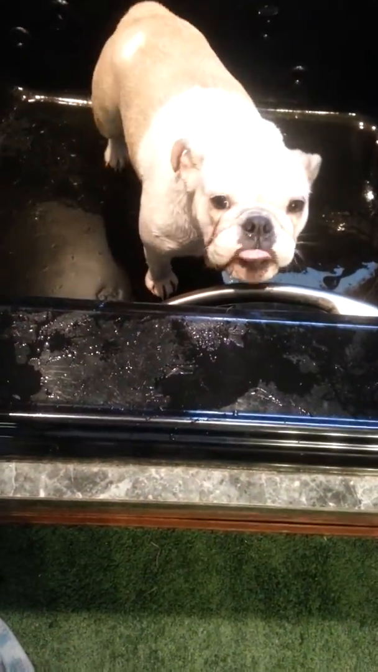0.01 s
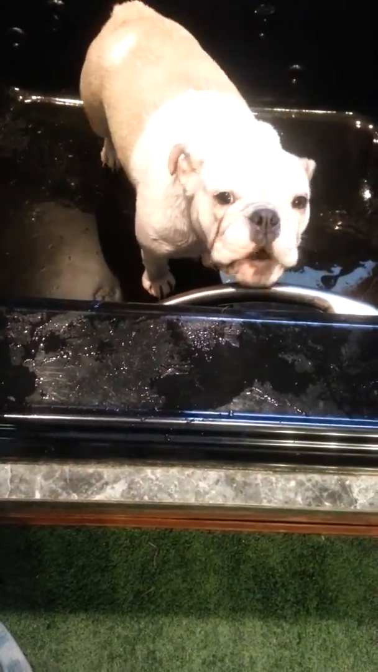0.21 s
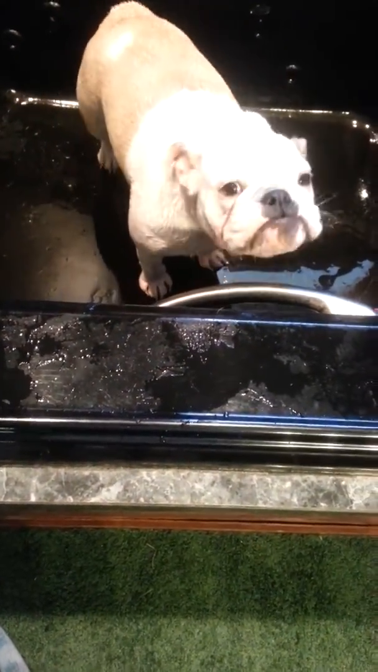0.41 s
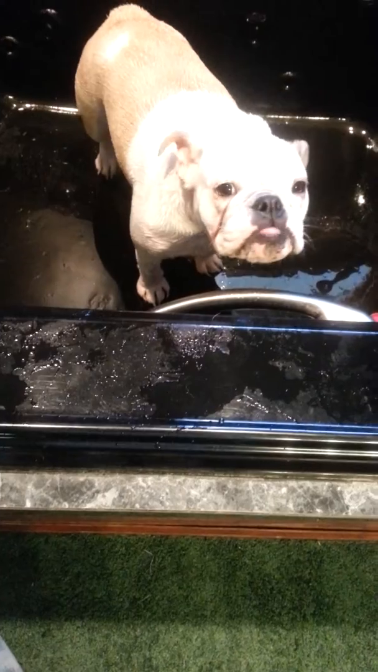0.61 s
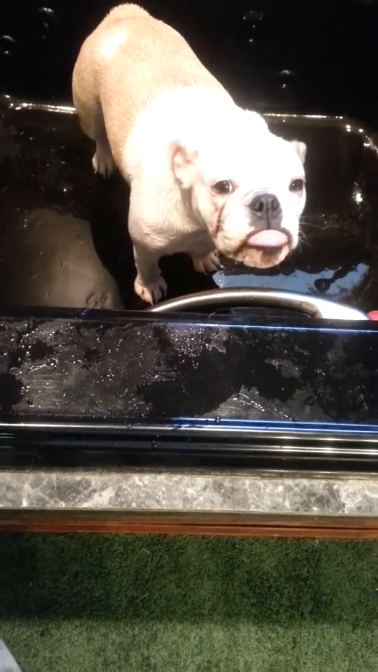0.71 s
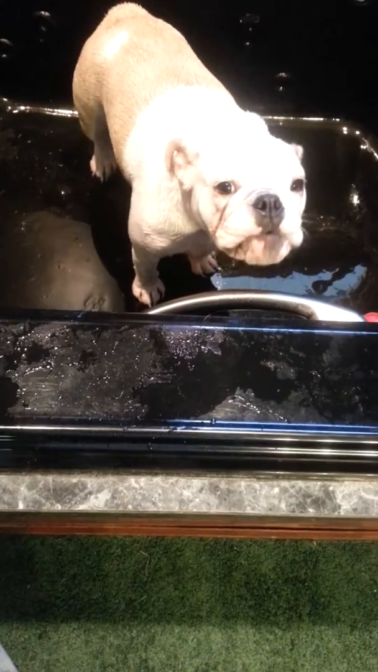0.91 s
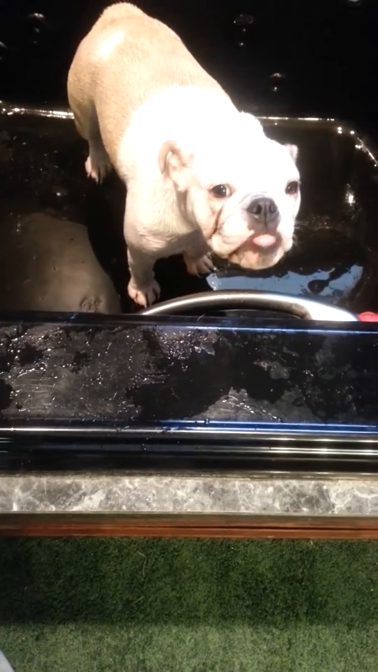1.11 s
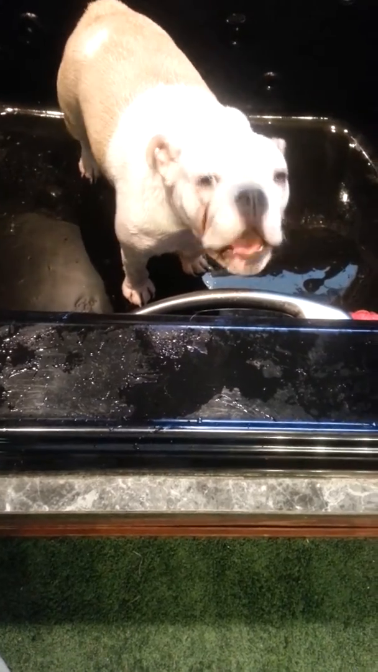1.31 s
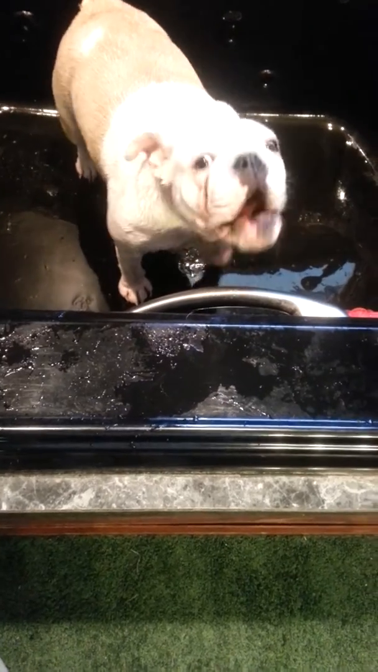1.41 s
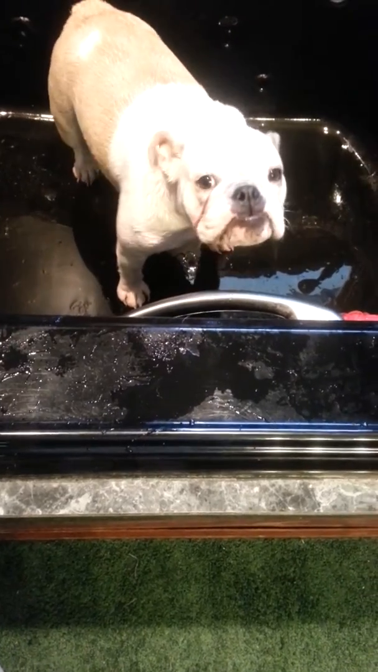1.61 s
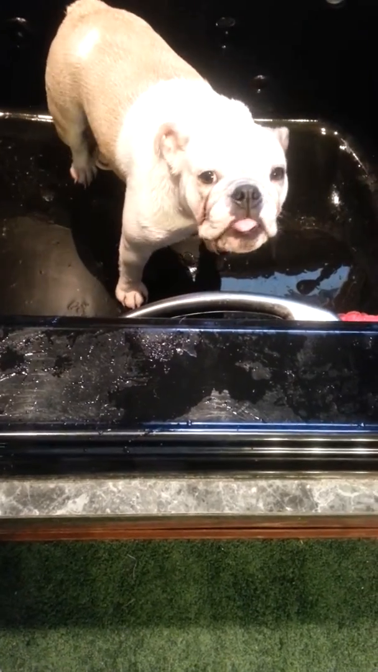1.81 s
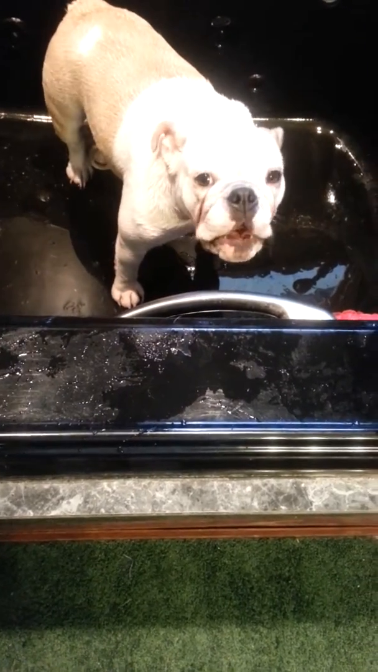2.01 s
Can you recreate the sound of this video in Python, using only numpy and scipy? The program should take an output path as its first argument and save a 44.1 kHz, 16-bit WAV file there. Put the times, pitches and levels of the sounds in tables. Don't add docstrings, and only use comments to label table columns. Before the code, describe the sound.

Two sharp, high-pitched puppy barks overload the microphone in a ringing tiled bathroom, between nasal huffs

```python
import sys
import numpy as np
from scipy import signal
from scipy.fft import rfft, irfft, next_fast_len
from scipy.io import wavfile
from scipy.ndimage import uniform_filter1d, minimum_filter1d

SR = 44100
rng = np.random.default_rng(int(sys.argv[2]) if len(sys.argv) > 2 else 0)


def generate_wav(sig):
    pcm = np.round(np.clip(np.atleast_2d(sig).T, -1, 1) * 32767).astype(np.int16)
    wavfile.write(sys.argv[1], SR, pcm)


def invert_db(level):
    return 10 ** (np.asarray(level, dtype=float) / 20)


N = 92610


def shape(x, gain):
    n = next_fast_len(x.shape[-1] + 4096)
    f = np.arange(n // 2 + 1) * SR / n + 1e-3
    return irfft(rfft(x, n) * gain(f), n)[..., :x.shape[-1]]


def unit(x):
    return x / np.sqrt(np.mean(x ** 2))


def peak(f, hz, width):
    return 1 / (1 + 1j * (f / hz - hz / f) * hz / width)


def points(f, table):
    table = np.array(table, float)
    return np.interp(np.log(f), np.log(table[:, 0]), table[:, 1])


def walk(rate_hz, size=N):
    k = max(int(SR / rate_hz), 1)
    noise = rng.standard_normal(size)
    return unit(uniform_filter1d(uniform_filter1d(noise, k), k))


def hum(hz, width):
    return unit(shape(rng.standard_normal(N), lambda f: peak(f, hz, width) ** 2))


def ring_down(age, t60):
    return np.exp(-np.log(1000) * age / t60)


def bark(rows, throat, second, jitter):
    jitter_hz, shimmer_db, low_rasp_db = 150, 2.5, -12
    rows = np.array(rows, float)
    start = int(rows[0, 0] * SR)
    t = np.arange(start, int(rows[-1, 0] * SR)) / SR
    hz, db, open_db, rasp_db = (np.interp(t, rows[:, 0], rows[:, k]) for k in range(1, 5))

    def tract(f):
        total = 0
        for k, (centre, width, gain_db) in enumerate(throat):
            total = total + (invert_db(gain_db + (k > 0) * open_db) * abs(peak(f, centre, width)) ** 2) ** 2
        return np.sqrt(total)

    voice = 0
    for ratio, gain_db in [(0.98, 0.0051)] + list(second):
        f = hz * ratio * (1 + jitter * walk(jitter_hz)[:len(t)])
        phase = 2 * np.pi * np.cumsum(f) / SR
        harmonics = range(1, int(12 / min(ratio, 1)))
        tone = sum(tract(k * f) * np.sin(k * phase + k * k) for k in harmonics)
        voice = voice + invert_db(gain_db + shimmer_db * walk(jitter_hz)[:len(t)]) * tone

    gate = .5 + .5 * np.cos(2 * np.pi * np.cumsum(hz) / SR)
    breath = rng.standard_normal(N)[:len(t)] * gate
    for k, (centre, width, gain_db) in enumerate(throat):
        rasp = unit(shape(breath, lambda f: peak(f, centre, width) ** 2))
        voice = voice + invert_db(rasp_db + gain_db + (open_db if k else low_rasp_db)) * rasp
    out = np.zeros(N)
    out[start:][:len(t)] = voice * invert_db(db)
    return out


def first_bark():
    # (time [s], pitch [Hz], level [dB], mouth opening [dB], rasp [dB])
    folds = [
        (.2385, 681.4, -39.5, -19, -27),
        (.2412, 652.6, 5, -21, -24.5),
        (.251, 648, 4, -9.5, -21),
        (.256, 630.7, -6, 10.5, 3),
        (.27, 600, -3.5, 6.5, -3.5),
        (.285, 575, 0, 6.5, -15.5),
        (.315, 557.6, -11.5, 13.5, -12),
        (.34, 530, -37.5, 31, -11),
    ]
    # (time [s], pitch [Hz], level [dB], mouth opening [dB], rasp [dB])
    broken = [
        (.282, 800, -24, 2.5, -5),
        (.293, 789.2, 5.5, -15, -15.5),
        (.315, 764.8, 5, -14.5, 0.5),
        (.34, 698, 0.5, -15, -11),
        (.37, 700.7, 2, -16.5, -10.5),
        (.40, 690, -27, -13.5, -19),
    ]
    # (centre [Hz], width [Hz], level [dB])
    throat = [(716, 332, 0.5), (1279, 140, -15), (1680, 290, -3.5), (2070, 210, -10.5), (2889, 150, -9),
              (3128, 460, -6), (4570, 3200, -16.5), (8000, 2300, -15.5)]
    # (pitch ratio to the folds, level [dB])
    second = [(0.5, -3)]
    return bark(folds, throat, second, 0.016) + bark(broken, throat, [(.91, -5)], 0.03)


def second_bark():
    # (time [s], pitch [Hz], level [dB], mouth opening [dB], rasp [dB])
    folds = [
        (1.297, 850, -50, -3.5, 2),
        (1.2995, 819, -31, -10, -6),
        (1.322, 666.5, -19.5, -28, 18.5),
        (1.333, 637.4, 4.5, -9.5, -5),
        (1.339, 892.8, 10, -4, 3.5),
        (1.365, 875.9, 3, 1.5, 0.5),
        (1.40, 850, 1.5, -3.5, 2.5),
        (1.424, 835.8, 6.5, -8, 0),
        (1.44, 830, -33.5, -19.5, 12),
    ]
    # (time [s], pitch [Hz], level [dB], mouth opening [dB], rasp [dB])
    dropped = [
        (1.418, 770, -23, -4, 4.5),
        (1.43, 755.8, 0.5, -16.5, 1.5),
        (1.455, 731.2, -6.5, -5.5, 3),
        (1.5, 714, -29.5, 2.5, 4.5),
    ]
    # (centre [Hz], width [Hz], level [dB])
    throat = [(830, 487, -0.5), (1340, 580, -11.5), (2200, 700, -2.5), (2963, 890, -3), (5150, 1600, -12.5),
              (7800, 330, -20)]
    # (pitch ratio to the folds, level [dB])
    second = [(1.25, -9), (0.2, -10)]
    return bark(folds, throat, second, 0.012) + bark(dropped, throat, [(.93, -7.5)], 0.03)


def snuffles():
    # (start [s], rise [s], hold [s], level [dB], brightness
    # [dB per octave])
    breaths = [(.0, 0.0063, 0.014, -56, 2.5), (0.027, 0.001, 0.02, -46.5, -1.5),
               (0.095, 0.043, 0.046, -52.5, -0.5), (0.185, 0.0022, 0.046, -45, -2.5),
               (0.385, 0.046, 0.086, -26.5, 2.5), (0.7729, 0.00092, 0.026, -39, 5.5),
               (0.796, 0.023, 0.043, -40, 1), (0.852, 0.019, 0.11, -47, -1),
               (0.873, .001, 0.0055, -43.5, 3), (0.953, 0.0009, 0.0043, -42, 1.5),
               (1.013, 0.064, .12, -63, 4), (1.2975, 0.00089, 0.031, -33, -0.5),
               (1.457, 0.079, 0.063, -25, 2), (1.66, 0.016, 0.066, -47, 9),
               (1.692, 0.014, 0.034, -44.5, -6.5), (1.962, 0.019, 0.074, -61.5, -5)]
    # (centre [Hz], width [Hz], level [dB])
    nostrils = [(500, 280, -2.5), (850, 140, -2), (1210, 450, -2.5), (1700, 590, -14), (2160, 1100, -3.5),
                (2760, 1200, -7), (3780, 1300, -0.5), (4820, 1100, -1), (7200, 1800, -8.5),
                (11400, 1500, -19.5)]
    fall_ratio, flutter_hz, flutter_db = 0.26, 60, 1.5
    t = np.arange(N) / SR
    s, rise, hold, db, tilt_db = np.array(breaths, float).T[:, :, None]
    attack = np.clip((t - s) / rise, 0, 1)
    fall = np.exp(-np.clip(t - s - rise - hold, 0, None) / (fall_ratio * hold))
    puffs = invert_db(db) * attack * fall
    bands = [invert_db(gain_db + walk(30)) * hum(hz, width) for hz, width, gain_db in nostrils]
    octaves = np.log2(np.array(nostrils)[:, :1] / 2000)
    weights = invert_db(octaves * tilt_db.T) @ puffs
    return (weights * bands).sum(axis=0) / 2 * invert_db(flutter_db * walk(flutter_hz))


def whistles():
    # (start [s], length [s], pitch [Hz], width [Hz], level [dB])
    squeaks = [
        (.79, .06, 1680, 70, -45),
        (.87, 0.068, 2560, 90, -42.5),
        (1.031, 0.22, 2517, 120, -61),
        (1.782, 0.18, 2650, 80, -63.5),
    ]
    t = np.arange(N) / SR
    out = np.zeros(N)
    for s, length, hz, width, db in squeaks:
        swell = np.sin(np.pi * np.clip((t - s) / length, 0, 1))
        out += invert_db(db) * swell * hum(hz, width)
    return out


def paws():
    # (time [s], peak [dB], hardness [dB per octave], mode favoured by the spot [Hz])
    steps = [(0.027, -34.5, -3.5, 840), (0.086, -46, 1, 760), (0.145, -41.5, 6.5, 500),
             (0.196, -26, 6, 500), (0.795, -34.5, 8.5, 800), (0.817, -26, 5.5, 790), (0.874, -21.5, 3, 600),
             (0.883, -30.5, -2, 600), (0.9, -25.5, -4.5, 500), (0.956, -24.5, -7, 400),
             (0.979, -24.5, -11, 400), (1.029, -37.5, -12, 300), (1.049, -38.5, -9.5, 280),
             (.41, -19.5, -2.5, 300), (1.439, -26, -5, 290), (1.472, -22.5, -18, 290),
             (1.499, -16.5, -12, 296), (1.536, -25, -12, 291), (1.571, -29.5, -12.5, 290),
             (1.639, -27.5, 3.5, 500)]
    # (pitch [Hz], level [dB], t60 [s])
    modes = [(215, -26, 0.044), (275, 8.5, 0.051), (294, -10.5, 0.12), (410.4, -5, 0.082),
             (535.5, -5, 0.02), (600, -4.5, 0.06), (690, -15.5, 0.04), (770, -11, 0.031),
             (850, -12.5, 0.04), (1640, -22, 0.08), (2786, -20.5, 0.045)]
    paws_db, knock_db, pad_s, low_hz = 1, -26.5, 0.0016, 230
    spot_db, spot_octaves, detune_ratio = 7, .2, 0.0091
    out, t = np.zeros(N + SR), np.arange(SR // 3) / SR
    hz, db, t60 = np.array(modes, float).T[:, :, None]
    for s, peak_db, hard_db, spot_hz in steps:
        spread, detune = rng.standard_normal((2, len(modes), 1))
        spot = spot_db * np.exp(-(np.log2(hz / spot_hz) / spot_octaves) ** 2)
        gain = invert_db(db + spread + hard_db * np.log2(hz / hz[1]) + spot)
        tones = np.sin(2 * np.pi * hz * (1 + detune_ratio * detune) * t)
        ring = (gain * tones * ring_down(t, t60)).sum(axis=0)
        knock = invert_db(knock_db + hard_db) * rng.standard_normal(len(t)) * np.exp(-t / .004)
        out[int(s * SR):][:len(t)] += invert_db(peak_db + paws_db) * (ring / 2 * (1 - np.exp(-t / pad_s)) + knock)
    return shape(out[:N], lambda f: (f / (f - 1j * low_hz)) ** 3)


def thuds():
    # (time [s], peak [dB], pitch [Hz], t60 [s])
    stomps = [
        (0.029, -55.5, 90, 0.13),
        (0.179, -47, 85, 0.25),
        (0.816, -43, 90, 0.14),
        (.87, -46, 96, 0.22),
        (.955, -46, 85, 0.093),
        (1.71, -46, 111, .15),
    ]
    t = np.arange(N) / SR
    s, db, hz, t60 = np.array(stomps, float).T[:, :, None]
    age = np.clip(t - s, 0, None)
    onset = 1 - np.exp(-age / 0.018)
    return (invert_db(db) * np.sin(2 * np.pi * hz * age) * onset * ring_down(age, t60)).sum(axis=0)


def room(x):
    # (centre [Hz], t60 [s], level [dB])
    decays = [(200, 0.19, -12.5), (463, 0.42, -1), (800, 0.4, 2.5), (1410, 0.42, 3), (2930, 0.38, -3.5),
              (6912, 0.53, -8.5), (12000, 0.33, -13.5)]
    room_db, gap_s, build_s, fade_s = -4, 0.0038, 0.0099, 0.39
    like = 0.19
    t = np.arange(SR) / SR
    echo = 0
    for hz, t60, db in decays:
        mid, side = shape(rng.standard_normal((2, SR)), lambda f: peak(f, hz, hz) ** 2)
        pair = np.sqrt(1 + like) * mid + np.sqrt(1 - like) * side * np.array([[1], [-1]])
        echo = echo + invert_db(db) * pair * ring_down(t, t60) / np.sqrt(t60)
    echo = echo * np.clip((t - gap_s) / build_s, 0, 1) * np.exp(-(t / fade_s) ** 4)
    return invert_db(room_db) * signal.fftconvolve(x[None], 3 * echo / np.sqrt(SR / 2), axes=1)[:, :N]


def quiet():
    # (frequency [Hz], density [dB per Hz])
    spectrum = [(18, -83.5), (70, -36), (160, -9), (260, -9.5), (774, -14), (1090, -17), (2700, -20),
                (14000, -33)]
    # (centre [Hz], width [Hz], level [dB], swell start [s])
    drone = [(90, 91, -69.5, -1), (145, 8.6, -61, 1.42), (215, 18, -58.5, 1.59), (519, 170, -57, 1.96),
             (880, 40, -72, 1.97)]
    quiet_db, wander_db, swell_s, swell_from_db = -56, 2, 0.48, -12.5
    t, noise = np.arange(N) / SR, rng.standard_normal((3, N))
    shared = noise[:2] + 0.71 * noise[2]
    out = unit(shape(shared, lambda f: invert_db(points(f, spectrum)))) * invert_db(quiet_db + wander_db * walk(6.8))
    for hz, width, db, s in drone:
        swell_db = swell_from_db * np.clip(1 - (t - s) / swell_s, 0, 1)
        out = out + invert_db(db + swell_db) * hum(hz, width)
    return out


def scene():
    right_lag_s, pan_db, nose_room_db, paw_room_db = -.00013, 0.5, -5, 1
    voice = first_bark() + second_bark()
    nose = snuffles() + whistles()
    feet = paws()
    dog = voice + nose + feet
    right = shape(dog, lambda f: np.exp(-2j * np.pi * f * right_lag_s))
    direct = np.array([dog * invert_db(pan_db / 2), right * invert_db(-pan_db / 2)])
    echo = room(voice + invert_db(nose_room_db) * nose + invert_db(paw_room_db) * feet)
    return direct + echo + quiet() + thuds()


def low_pass(x):
    return signal.sosfilt(signal.butter(12, 20000, fs=SR, output="sos"), x)


def record(dry):
    # (frequency [Hz], left minus right [dB])
    balance = [(60, -1), (250, -0.5), (600, -2.5), (1200, -1.5), (2400, 8), (5000, 7), (9000, -11.5),
               (14000, -3)]
    mic_top_hz, top_hz, low_hz, top_shelf = 14400, 16500, 60, .025
    limit_db, ratio, hold_s, release_s = -6.5, 1.995, .004, 0.058
    drive_db, skew, clip_knee, out_db = 1.5, 0.012, 4, 0.7
    sides = np.array([[.5], [-.5]])
    x = shape(dry, lambda f: invert_db(points(f, balance) * sides) / (1 + (f / mic_top_hz) ** 60))
    floor = -minimum_filter1d(-abs(x).max(axis=0), int(hold_s * SR))
    rate = 1 / (release_s * SR)
    loud = signal.lfilter([rate], [1, rate - 1], floor)
    x = x * invert_db(drive_db) * np.maximum(loud / invert_db(limit_db), 1) ** (1 / ratio - 1)
    x = x + skew * np.minimum(x ** 4, 4)
    x = x / (1 + abs(x) ** clip_knee) ** (1 / clip_knee) * invert_db(out_db)
    x = shape(x, lambda f: (top_shelf + 1 / (1 + (f / top_hz) ** 40)) * f / (f - 1j * low_hz / 4))
    return low_pass(x)


dry = scene()
out = record(dry)
generate_wav(out)
```